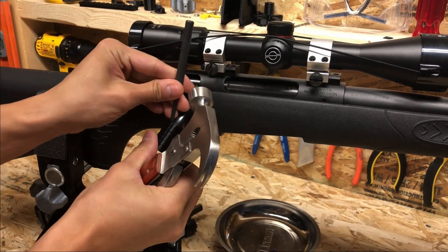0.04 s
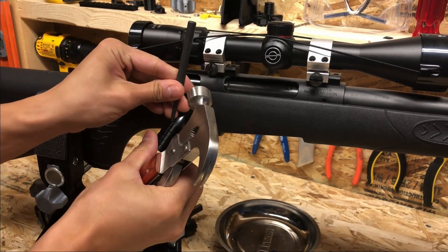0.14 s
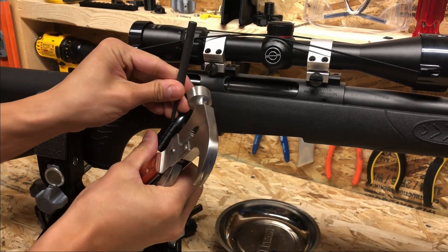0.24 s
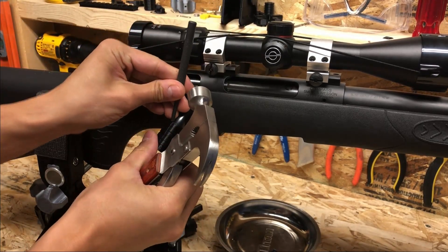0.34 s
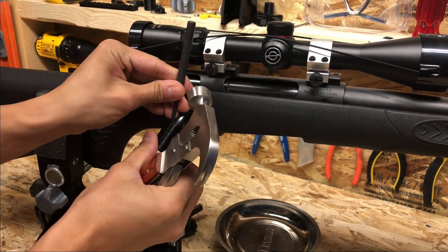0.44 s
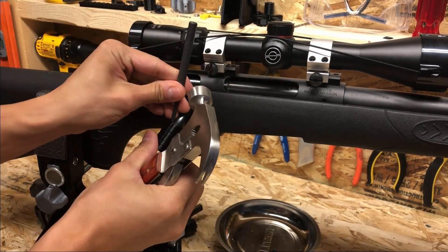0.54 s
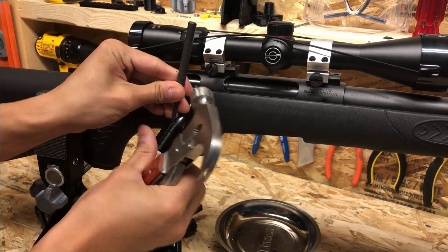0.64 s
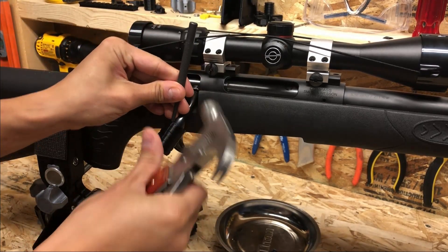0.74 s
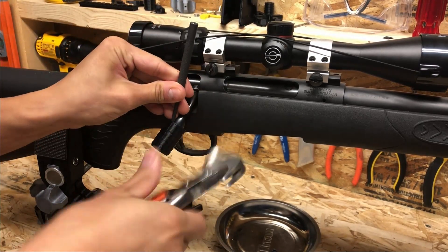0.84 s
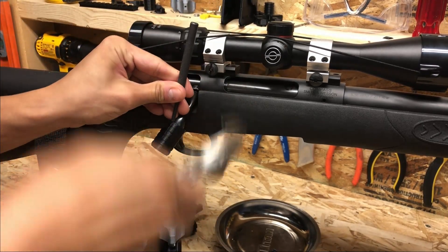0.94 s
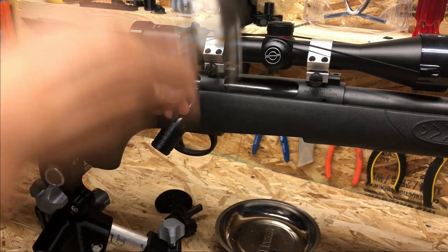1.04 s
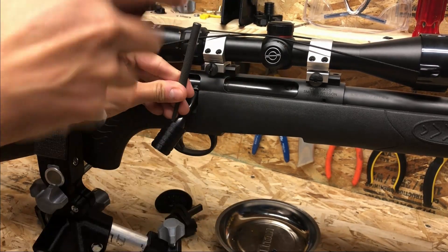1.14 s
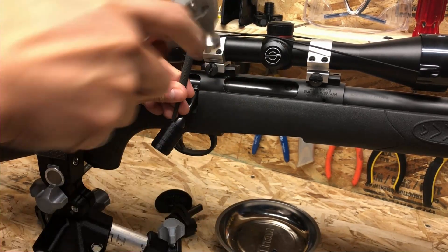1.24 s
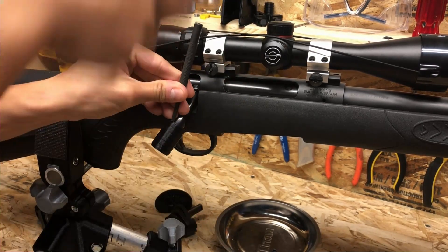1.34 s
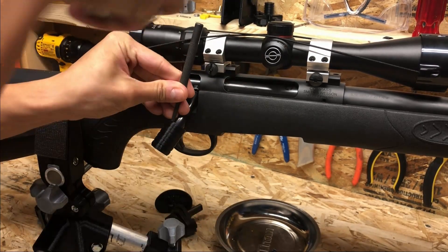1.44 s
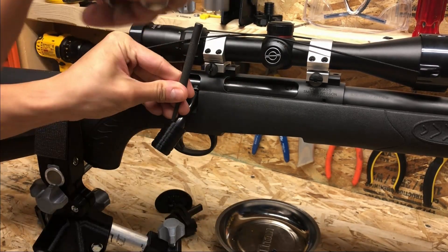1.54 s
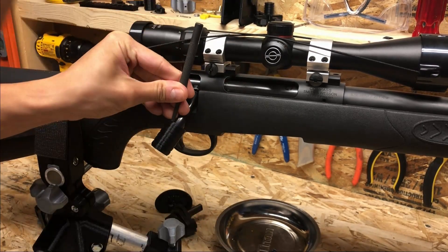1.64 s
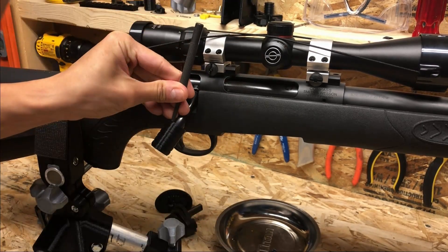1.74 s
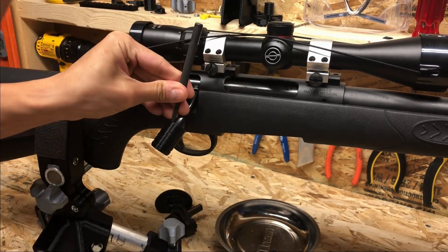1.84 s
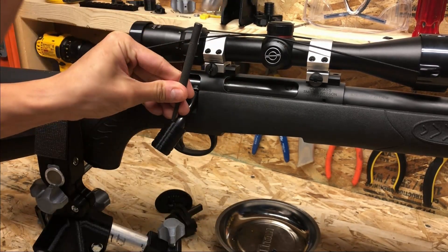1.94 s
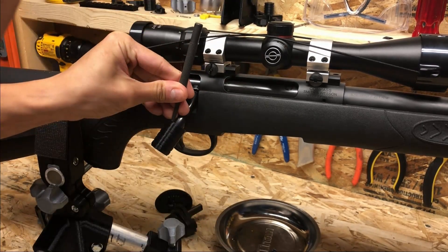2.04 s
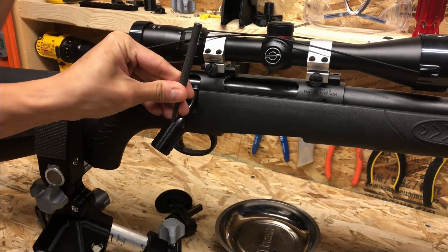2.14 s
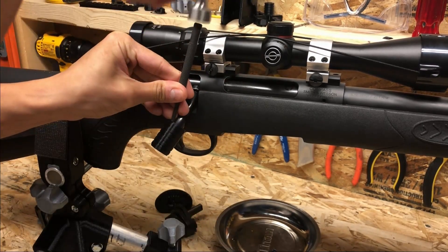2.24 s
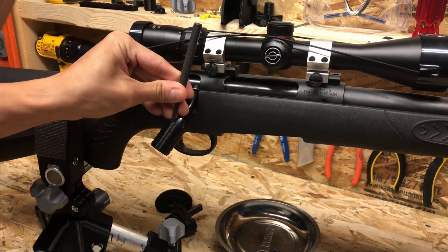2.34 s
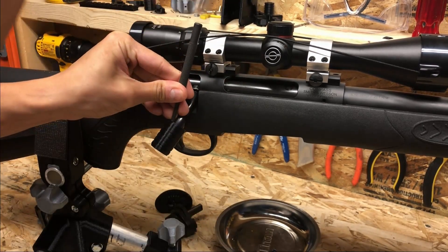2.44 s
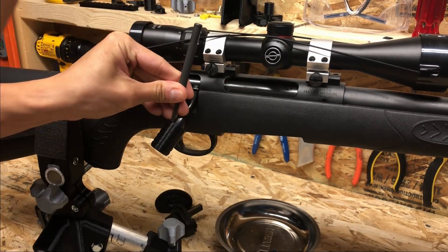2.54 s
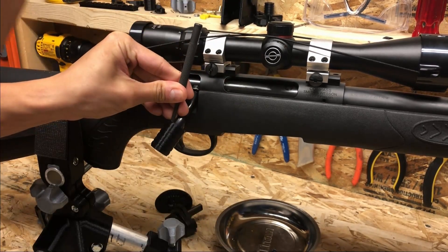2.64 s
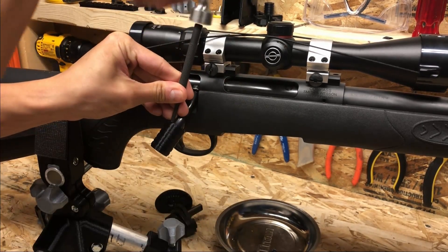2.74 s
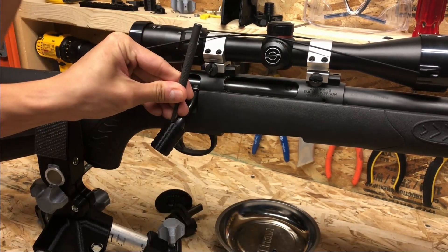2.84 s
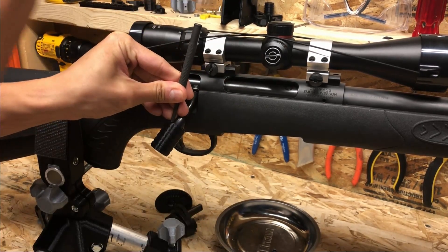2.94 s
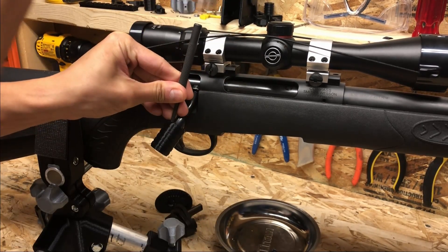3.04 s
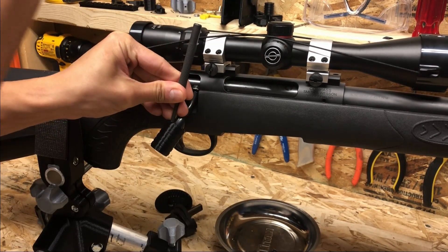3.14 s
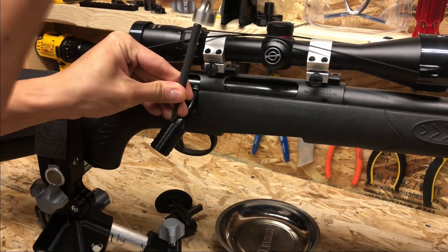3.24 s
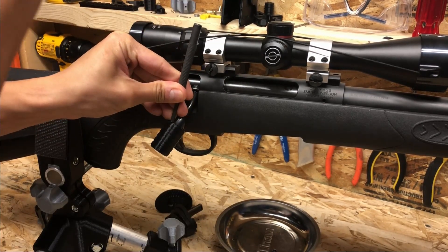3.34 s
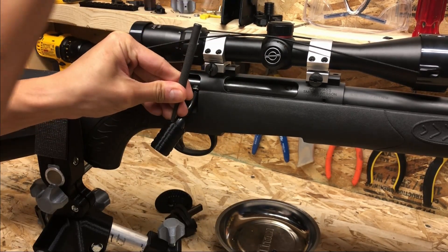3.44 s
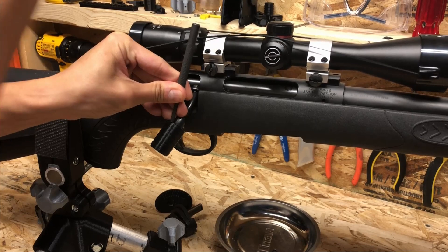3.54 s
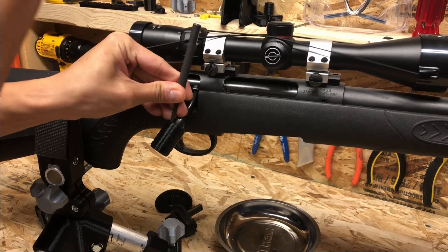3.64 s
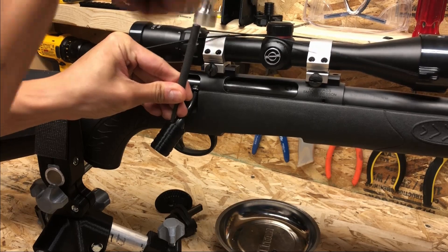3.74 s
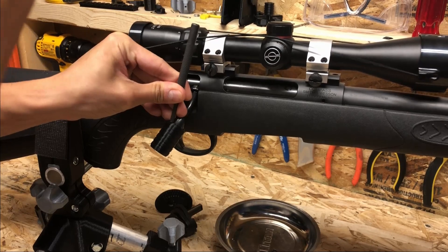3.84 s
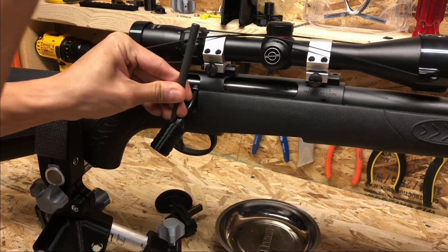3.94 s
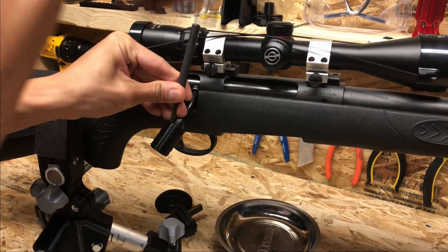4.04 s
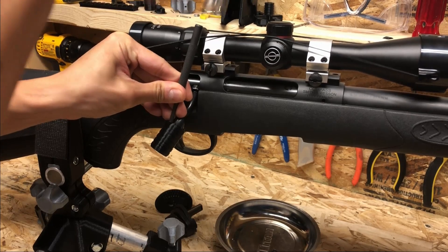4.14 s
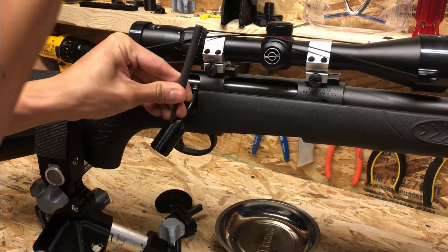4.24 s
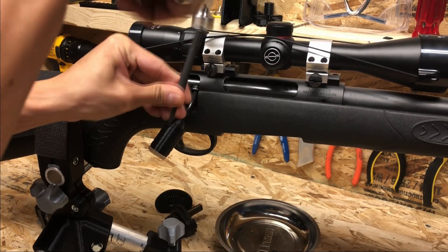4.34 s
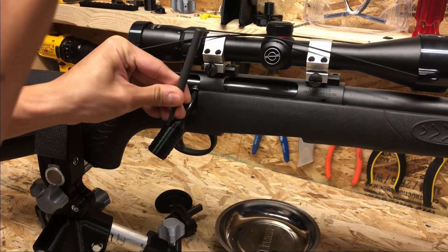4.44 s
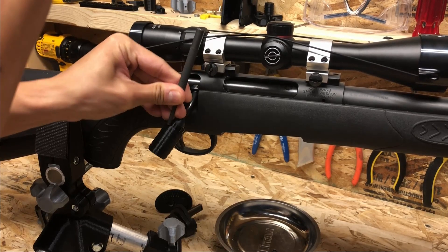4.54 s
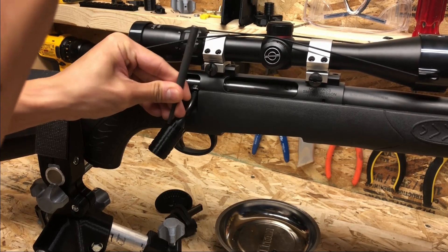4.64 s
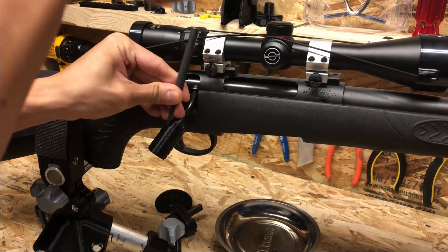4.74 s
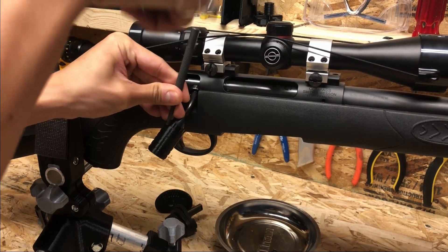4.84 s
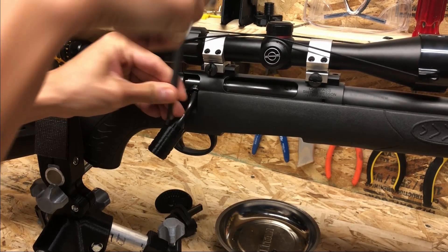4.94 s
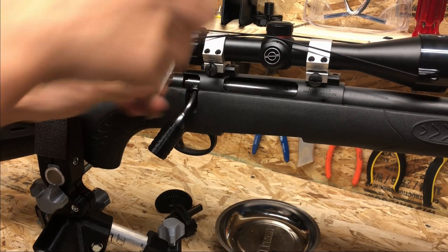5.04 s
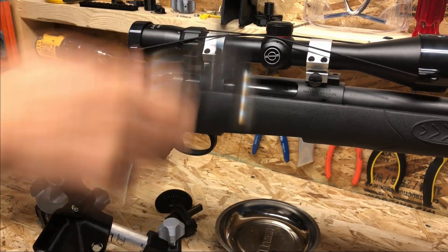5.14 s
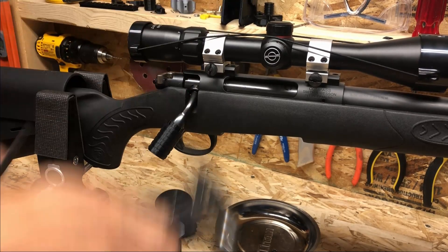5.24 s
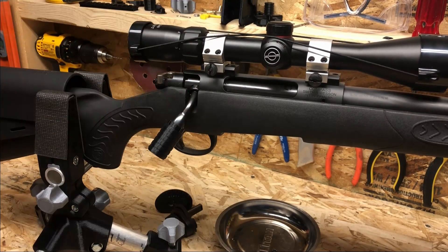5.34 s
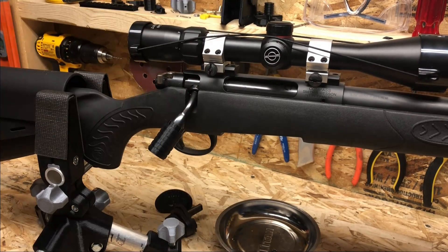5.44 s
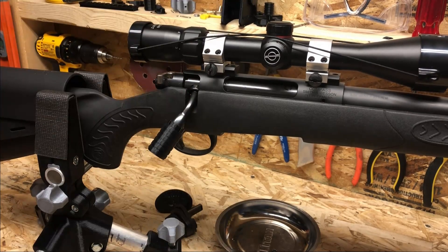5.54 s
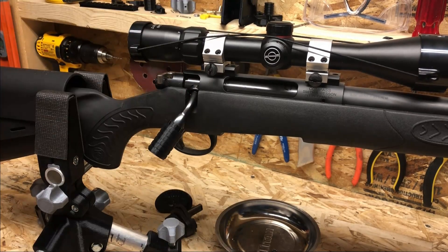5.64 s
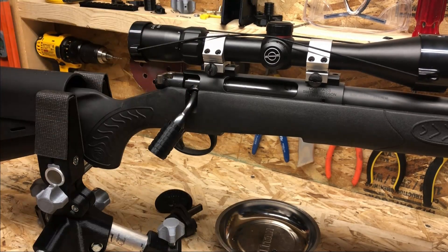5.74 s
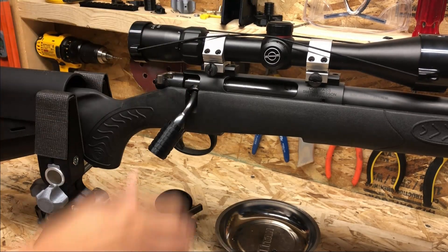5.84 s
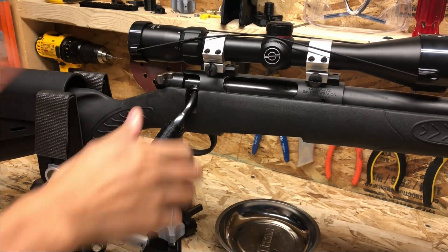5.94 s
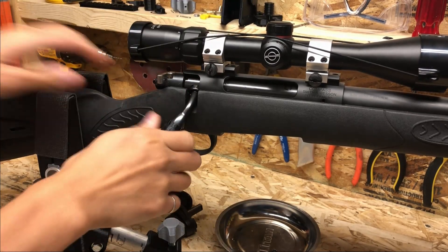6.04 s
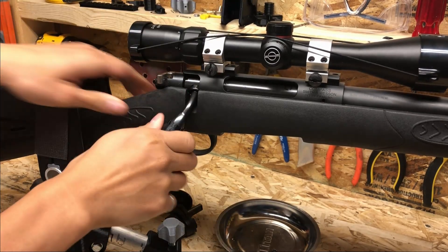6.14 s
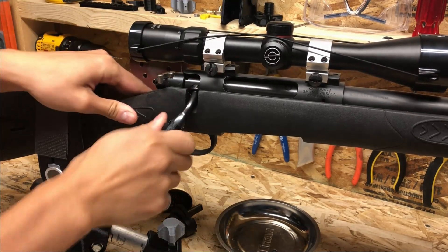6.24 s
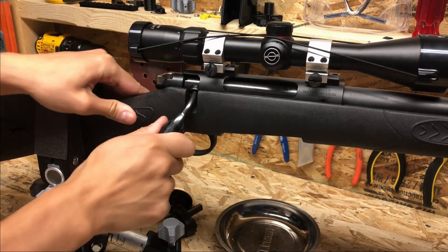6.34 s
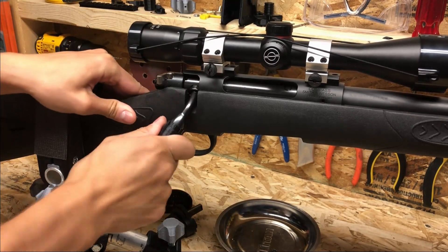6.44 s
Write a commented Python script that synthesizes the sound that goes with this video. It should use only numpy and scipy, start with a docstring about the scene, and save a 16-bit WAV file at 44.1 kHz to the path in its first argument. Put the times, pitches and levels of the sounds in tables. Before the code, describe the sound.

Quick, steady taps of a hammer on a steel punch start lightly and grow firmer, ten in all, each with a low thump from the rifle stock beneath. A small metallic tick follows, then a cluster of knocks and clinks as tools land on a wooden workbench. A short rub of a steel bolt comes last. Everything sounds near, in a small room with faint low air noise.

```python
"""Tapping a punch on a rifle

In a small workshop a hammer taps a steel punch ten times against a rifle clamped in a rest on a wooden
bench. Each tap is a steel crack, a clack of the action, a thud of the stock and a slow sway of the rest.
The punch ticks as it is drawn out, the tools are laid on the bench with a clattering knock, and the bolt
starts to slide, steel rubbing on steel. Room air rumbles faintly underneath."""
import sys
import numpy as np
from scipy import signal
from scipy.fft import rfft, irfft
from scipy.io import wavfile
from scipy.ndimage import uniform_filter1d

SR = 44100
rng = np.random.default_rng(int(sys.argv[2]) if len(sys.argv) > 2 else 0)


def int16_out(signal):
    """Quantize to a 16-bit WAV file."""
    q = np.round(np.clip(np.atleast_2d(signal).T, -1, 1) * 32767)
    wavfile.write(sys.argv[1], SR, q.astype(np.int16))


N = 285864
AGE_S = np.arange(SR // 2) / SR   # time since a contact


def from_db(db):
    """Decibels to gain."""
    return 10 ** (np.asarray(db) / 20)


def decay(t60_s):
    """Envelope falling 60 dB in t60_s."""
    return np.exp(-np.log(1000) * AGE_S / t60_s)


def swell(rise_s):
    """Envelope rising from 0 to 1."""
    return 1 - np.exp(-(AGE_S / rise_s) ** 2)


def unit(x):
    """Scale to the energy of 50 ms at rms 1."""
    return x / np.sqrt(np.sum(x ** 2) / (SR / 20) + 1e-20)


def tone(hz, t60_s):
    """One damped sine."""
    return np.sin(2 * np.pi * hz * AGE_S) * decay(t60_s)


def noise(spectrum, size=len(AGE_S)):
    """Coloured noise, rms 1."""
    hz, db = np.transpose(spectrum)
    bins_hz = np.maximum(np.fft.rfftfreq(size, 1 / SR), 1)
    colour = from_db(np.interp(np.log(bins_hz), np.log(hz), db))
    low_cut = np.minimum(bins_hz / hz[0], 1)
    x = irfft(rfft(rng.standard_normal(size)) * colour * low_cut, size)
    return x / np.std(x)


def ringing(modes, vary_db, detune):
    """Damped sines of alternating sign; each blow shares its force among them differently."""
    out = 0
    for k, (hz, db, t60_s) in enumerate(modes):
        strength, shift = rng.standard_normal(2)
        out += (-1) ** k * from_db(db + vary_db * strength) * tone(hz * (1 + detune * shift), t60_s)
    return out


def add(track, start_s, sound):
    """Mix a sound into a track."""
    start = int(round(start_s * SR))
    track[start:start + len(sound)] += sound[:N - start]


def workshop(x, wet_db, t60_s, rise_s):
    """Crowded shelves and hands scatter a sound into a short dense tail."""
    envelope = swell(rise_s) * (decay(t60_s) + from_db(-30) * decay(0.31))
    tail = rng.standard_normal(len(AGE_S)) * envelope
    wet = signal.fftconvolve(x, tail / np.linalg.norm(tail))[:len(x)]
    return x + from_db(wet_db) * wet


# Air spectrum: freq_hz, density_db
AIR_SPECTRUM = [(20, -1.5), (48, 0), (100, -8.5), (135, -18.5), (205, -15), (260, -25.5), (325, -22),
                (390, -32), (450, -29), (900, -33.5), (1500, -45.5), (3500, -54), (4900, -49),
                (16000, -57.5)]


def room_air():
    """Steady low rumble of the room."""
    return from_db(-58.5) * noise(AIR_SPECTRUM, size=N)


# Slide envelope: time_s, level_db
BOLT_ENVELOPE = [(6.37, -78), (6.39, -59.5), (6.406, -58), (6.422, -33), (6.46, -26), (6.48, -43)]
# Friction spectrum: freq_hz, density_db
BOLT_SPECTRUM = [(200, -17), (300, 16), (450, 10), (900, 8.5), (1500, -2.5), (3700, -10), (5400, -2),
                 (7200, -13), (9800, -15.5), (11500, -37), (16000, -37)]


def bolt_slide():
    """Steel rubs on steel in one brief swell of noise."""
    time_s, level_db = np.transpose(BOLT_ENVELOPE)
    envelope = from_db(np.interp(np.arange(N) / SR, time_s, level_db, left=-200))
    return envelope * noise(BOLT_SPECTRUM, size=N)


# Steel touches: start_s, relative_db, grip_pitch_ratio, scratch_re_ring_db
TOOL_TICKS = [(4.485, -63, 1.4, -8), (4.999, -41.5, 0.99, -14), (5.262, -50.5, 1.19, -2.5),
              (5.549, -55, 0.82, -5.5), (5.655, -39.5, .97, -0.5), (5.679, -53, 1.1, 8)]
# Loosely held punch modes: freq_hz, level_db, t60_s
LOOSE_PUNCH_MODES = [(3040, -23, 0.05), (4280, -11.5, 0.013), (4993, -0.5, 0.018), (5490, 0, 0.021),
                     (6550, -1, 0.013), (7770, -2, .02), (9300, -1, 0.021), (9660, -1.5, 0.026),
                     (10900, -5.5, 0.025), (13520, 1, .01), (15260, 4.5, 0.01)]
# Steel contact spectrum: freq_hz, density_db
STEEL_SPECTRUM = [(2000, -30.5), (3900, -19), (4850, -0.5), (5400, -0.5), (6200, -4.5), (7100, -10),
                  (8400, -1.5), (10200, -4.5), (11300, -7.5), (13300, -16.5), (14600, -9), (15600, -12.5),
                  (16000, -19), (17000, -23.5)]


def tool_ticks():
    """The punch leaves its hole; the tools touch as they are laid down."""
    out = np.zeros(N)
    for start_s, relative_db, pitch_ratio, scratch_db in TOOL_TICKS:
        modes = np.array(LOOSE_PUNCH_MODES) * [pitch_ratio, 1, 1]
        ring = unit(ringing(modes, vary_db=2, detune=0.002) * swell(0.00071))
        scratch = unit(noise(STEEL_SPECTRUM) * swell(0.00072) * decay(0.064))
        tick = from_db(relative_db - 4) * unit(ring + from_db(scratch_db) * scratch)
        add(out, start_s, workshop(tick, wet_db=-7.5, t60_s=0.16, rise_s=0.0039))
    return out


# Knocks on wood: start_s, level_db, click_re_knock_db
WOOD_KNOCKS = [(5.5475, -24, -19), (5.6490, -25, -23), (5.6802, -21.5, -9), (5.7053, -33.5, -43),
               (5.804, -32, -35), (6.253, -56.5, -40), (6.276, -39.5, -61), (6.4178, -38.5, -10.5)]
# Bench modes: freq_hz, level_db, t60_s
WORKBENCH_MODES = [(118, -11, 0.34), (146.6, 2, 0.11), (182.3, -3.5, 0.28), (219.3, -12, 0.18),
                   (322.6, -2.5, 0.15), (325, -4, 0.019), (425, -4, 0.043), (436, -8, 0.16),
                   (544, 5, 0.079), (611, 4.5, 0.046), (672, 5.5, 0.04), (735, 3.5, 0.049), (903, -9, 0.16),
                   (1040, -16.5, 0.061), (1287, -9.5, 0.13)]
# Dense wood resonances: freq_hz, density_db
WOOD_SPECTRUM = [(90, -9.5), (170, 3.5), (350, 7), (700, -4.5), (1100, -8.5), (2000, -16.5), (3500, -29),
                 (8000, -33)]
# Edge click spectrum: freq_hz, density_db
CLICK_SPECTRUM = [(200, -6), (750, 15), (1400, 1), (2600, -2.5), (3700, -15), (5200, -8.5), (7000, -26),
                  (9000, -14.5), (14000, -48)]


def bench_knocks():
    """Blunt contacts ring the wood: heavy ones reach lower, hard ones reach higher and click."""
    heavy_db, low_hz_per_db = -24.5, 7.5
    out = np.zeros(N)
    for start_s, level_db, click_db in WOOD_KNOCKS:
        modes = unit(ringing(WORKBENCH_MODES, vary_db=2.5, detune=0.013))
        dense = unit(noise(WOOD_SPECTRUM) * (decay(0.077) + from_db(4.5) * decay(0.19)))
        low_hz = 130 + low_hz_per_db * max(heavy_db - level_db, 0)
        high_hz = 794 + 3350 * from_db(click_db)
        contact = signal.butter(3, [low_hz, high_hz], "band", fs=SR, output="sos")
        knock = unit(signal.sosfilt(contact, modes + from_db(1) * dense))
        click = unit(noise(CLICK_SPECTRUM) * swell(0.00041) * decay(0.097))
        add(out, start_s, from_db(level_db) * knock)
        add(out, start_s + 0.001, from_db(level_db + click_db) * click)
    return out


# Modes of the clamped stock: freq_hz, level_db
CLAMPED_STOCK_MODES = [(166, 8.5), (260, -1), (318, -6.5), (346, -11.5), (410, -20.5), (452, -9),
                       (565, -10.5), (712, -17.5), (775, -19), (912, -16), (1040, -29.5), (1365, -22.5),
                       (2140, -32.5)]
# Dense stock resonances: freq_hz, density_db
STOCK_SPECTRUM = [(110, -15), (170, 8.5), (330, 11.5), (550, -6.5), (900, -14.5), (1200, -20), (2000, -41),
                  (4000, -57.5)]


def stock_thud(push_db):
    """The stock thumps on a low note; a stronger push flattens it and wakes the other modes more."""
    note_hz = 186.5 - push_db   # sags 1 Hz per dB
    level_db = -25.5 + push_db
    upper_db = 0.13 * (level_db + 18)
    note = unit(tone(note_hz, t60_s=0.085) * swell(0.018))
    damped = [(hz, db, 0.18) for hz, db in CLAMPED_STOCK_MODES]
    modes = unit(ringing(damped, vary_db=1.33, detune=0.006) * swell(0.0046))
    dense = unit(noise(STOCK_SPECTRUM) * swell(0.0072) * decay(0.24))
    return from_db(level_db) * unit(note + from_db(upper_db) * (modes + from_db(-7) * dense))


def rest_sway(force_db):
    """The rest rocks, growing faster than the force."""
    return from_db(-32 + 2.4 * force_db) * unit(tone(hz=52.6, t60_s=0.2) * swell(0.018))


# Loose parts of the rest: freq_hz, density_db
RATTLE_SPECTRUM = [(250, -13), (450, 5), (750, 2.5), (950, -2), (1200, -11.5), (2200, -18), (4000, -20),
                   (9000, -58.5)]


def rest_rattle():
    """A blow shakes the loose parts of the rest."""
    return unit(noise(RATTLE_SPECTRUM) * swell(0.0082) * decay(0.15))


def rest_rebound():
    """The rest rocks back with a soft bump and a faint rattle."""
    bump = unit(noise(STOCK_SPECTRUM) * swell(0.0047) * decay(0.2))
    rattle = unit(noise(RATTLE_SPECTRUM) * swell(0.009) * decay(0.13))
    return bump + from_db(-10) * rattle


# Struck action spectrum: freq_hz, density_db
CLACK_SPECTRUM = [(700, -11), (1300, 3.5), (1800, -4.5), (2400, -4), (2950, -1), (3600, -0.5), (5000, -16)]


def action_clack(pitch_hz):
    """The struck action clacks briefly around one pitch."""
    spread = unit(noise(CLACK_SPECTRUM) * swell(0.0015) * decay(0.07))
    centre = unit(tone(pitch_hz, t60_s=0.012) * swell(0.0004))
    return unit(spread + from_db(-3.5) * centre)


# Modes of the punch pressed on the action: freq_hz, level_db
SEATED_PUNCH_MODES = [(5100, 1.5), (5600, -4.5), (6200, -9), (7500, -11), (8400, -2.5), (9200, -0.5),
                      (10700, 1), (11900, -10), (13000, -1.5), (14500, -6)]


def steel_crack(force_db, give_db, ring_db):
    """Hammer meets punch: high modes damped at once by the fingers, and chatter at the tip."""
    grip_t60_s, ping_hz = 0.0045, 15500
    ring_hz = 10048 + 128 * force_db   # force seats the punch harder
    ping_db = -10.5 - 0.8 * give_db
    damped = [(hz, db, grip_t60_s) for hz, db in SEATED_PUNCH_MODES]
    modes = unit(ringing(damped, vary_db=3.25, detune=0.013) * swell(0.00026))
    chatter = unit(noise(STEEL_SPECTRUM) * swell(0.0004) * (decay(0.015) + from_db(-13) * decay(0.05)))
    ring = unit(tone(ring_hz, grip_t60_s) * swell(0.001))
    ping = unit(tone(ping_hz, grip_t60_s) * swell(0.001))
    return unit(from_db(-6.5) * modes + chatter) + from_db(ring_db) * ring + from_db(ping_db) * ping


# Hammer blows: start_s, force_re_firm_blow_db, give_into_stock_db, ring_re_crack_db
HAMMER_TAPS = [(1.9951, -9, -2, -3.5), (2.2387, -6, -2, 2), (2.4776, -2, -4, -12), (2.7416, 0, 1, -9.5),
               (2.9837, -1.5, 2.5, -4.5), (3.233, 0, 1, -9.5), (3.4816, 0, 4, -3), (3.7541, 1, 5, -1.5),
               (4.067, 0, 4, -3.5), (4.3506, -1, -8.5, -1)]


def hammer_taps():
    """Steel sounds first, then stock and rest; what passes into the stock is lost to ping and clack."""
    steel, body = np.zeros(N), np.zeros(N)
    for k, (start_s, force_db, give_db, ring_db) in enumerate(HAMMER_TAPS):
        clack_hz = 3180 - 105 * k   # falls as the punch is driven in
        clack_db = -43.5 + 1.3 * force_db - 0.25 * give_db
        crack = from_db(-28.5 + force_db) * steel_crack(force_db, give_db, ring_db)
        clack = from_db(clack_db) * action_clack(clack_hz)
        add(steel, start_s, workshop(crack + clack, wet_db=-3.5, t60_s=0.14, rise_s=0.0038))

        push_db = force_db + give_db   # what reaches the stock
        rattle_db = -39.5 + 1.25 * push_db
        add(body, start_s + 0.002, stock_thud(push_db))
        add(body, start_s + 0.004, rest_sway(force_db))
        add(body, start_s + 0.004, from_db(rattle_db) * rest_rattle())
        add(body, start_s + 0.098, from_db(rattle_db - 16) * rest_rebound())
    return steel, body


def scene():
    """Bright steel fills the room; wood and bolt are heard mostly directly, over the room air."""
    steel, body = hammer_taps()
    bench = workshop(body + bench_knocks() + bolt_slide(), wet_db=-12, t60_s=0.092, rise_s=0.011)
    return (steel + tool_ticks() + bench + room_air())[None]


def record(dry):
    """Steep low-pass, 70 dB down from 17 kHz."""
    return signal.sosfilt(signal.cheby2(16, 70, 17000, fs=SR, output="sos"), dry)


dry = scene()
out = record(dry)
int16_out(out)
```